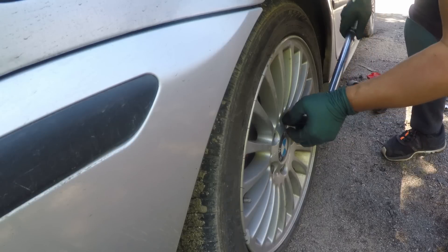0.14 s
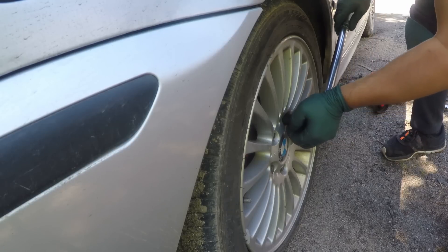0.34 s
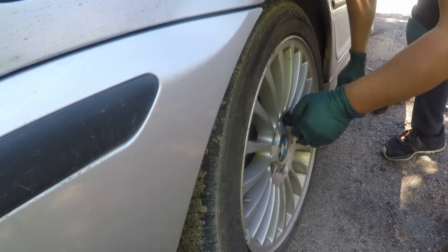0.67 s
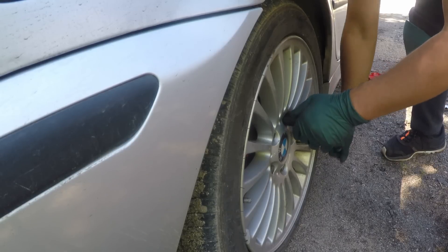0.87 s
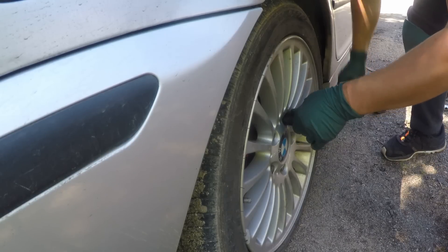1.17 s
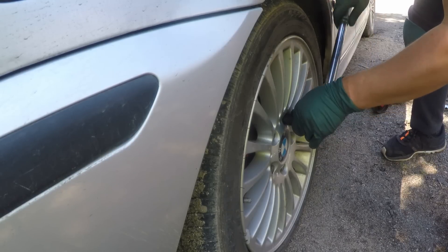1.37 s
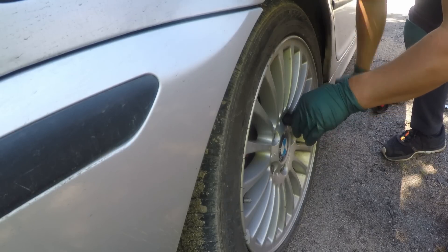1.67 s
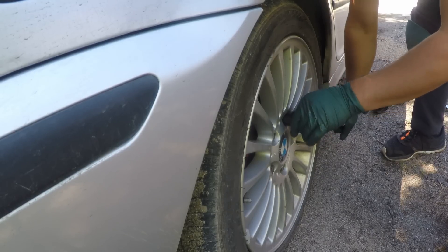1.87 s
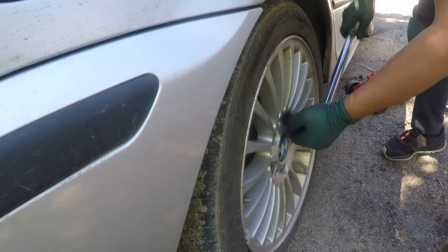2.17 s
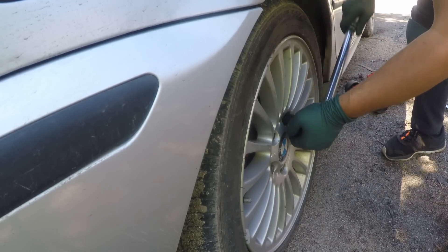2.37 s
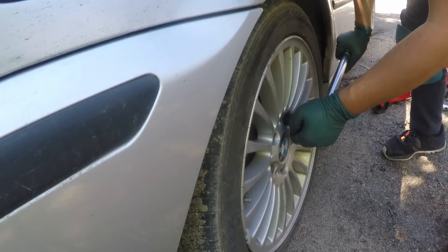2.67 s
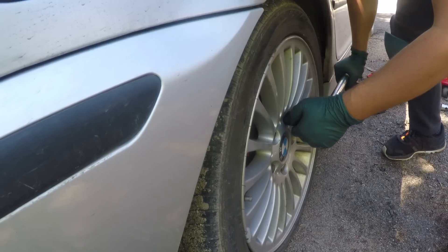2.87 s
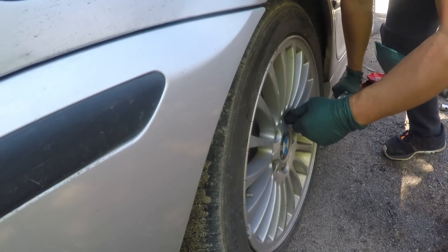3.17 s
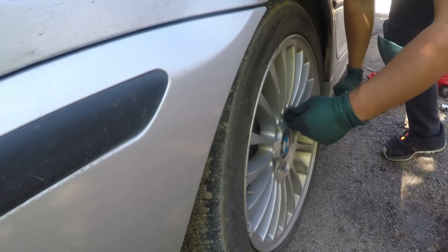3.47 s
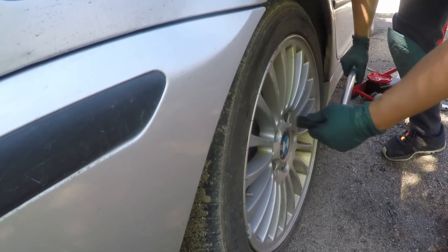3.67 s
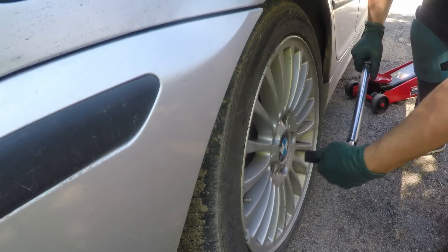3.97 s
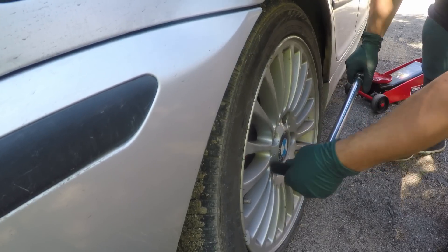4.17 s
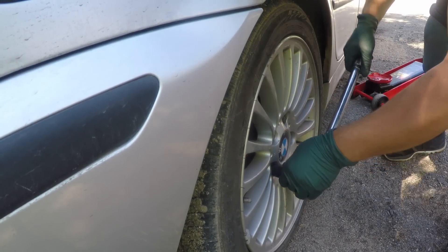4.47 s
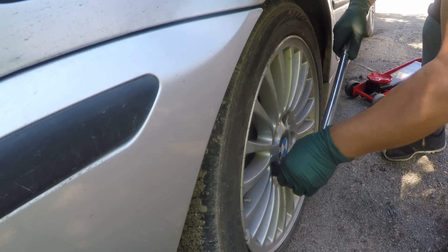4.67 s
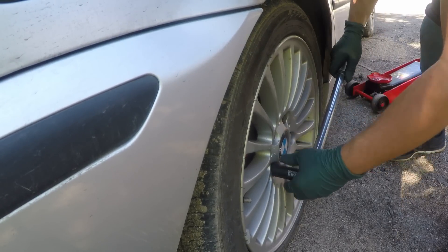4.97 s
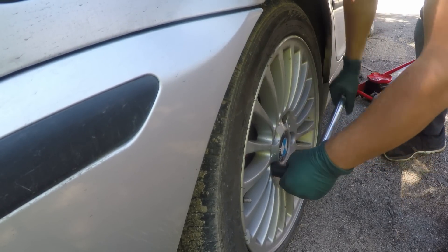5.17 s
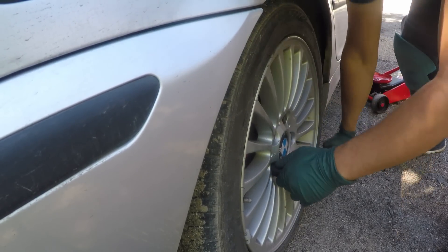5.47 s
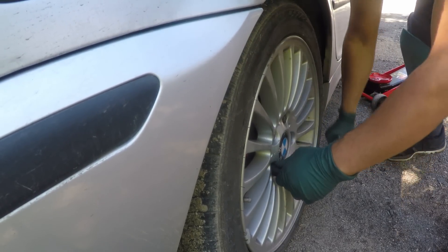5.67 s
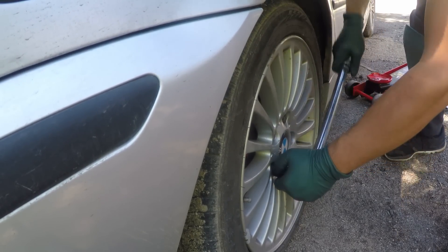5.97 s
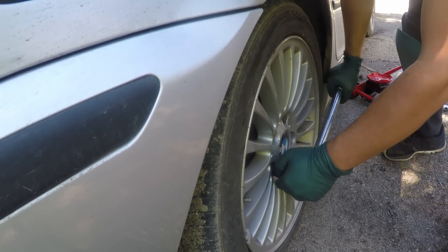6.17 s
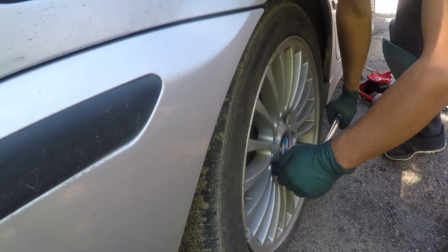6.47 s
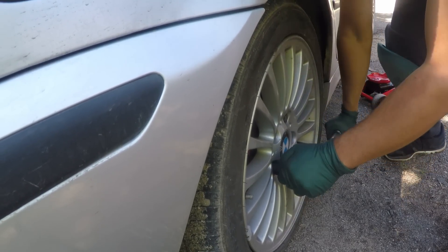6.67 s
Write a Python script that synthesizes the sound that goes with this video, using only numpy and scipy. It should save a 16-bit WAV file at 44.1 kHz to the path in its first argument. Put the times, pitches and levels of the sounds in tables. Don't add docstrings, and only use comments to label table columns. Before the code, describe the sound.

A wrench ratchets on a car wheel bolt outdoors in quick metallic click bursts, with two loud doubled release snaps over a low passing lorry drone.

```python
import sys
import numpy as np
from scipy import signal
from scipy.fft import rfft, irfft
from scipy.io import wavfile
from scipy.ndimage import uniform_filter1d, minimum_filter1d

SR = 44100
rng = np.random.default_rng(int(sys.argv[2]) if len(sys.argv) > 2 else 0)


def pcm_store(signal):
    levels = np.round(np.clip(np.atleast_2d(signal), -1, 1) * 32767)
    wavfile.write(sys.argv[1], SR, levels.astype(np.int16).T)


def amplitude_ratio(level_db):
    exponent = np.asarray(level_db, float) / 20
    return 10 ** exponent


N = 301203
RING = 8192


def unit(x):
    return x / np.sqrt(np.mean(x ** 2))


def colour(x, spectrum):
    hz, db = np.transpose(spectrum)
    f = np.linspace(1, SR / 2, x.shape[-1] // 2 + 1)
    gain = amplitude_ratio(np.interp(np.log(f), np.log(hz), db))
    return irfft(rfft(x) * gain, x.shape[-1])


def coloured_noise(spectrum):
    return unit(colour(rng.standard_normal(N + 1), spectrum))


def walk(rate):
    k = int(SR / rate)
    steps = np.repeat(rng.standard_normal(N // k + 1), k)[:N]
    return 1.3 * uniform_filter1d(uniform_filter1d(steps, k), k)


def fade(t, t60):
    return np.exp(-np.log(1000) * t / t60)


def curves(table):
    s, *columns = np.transpose(table)
    return [np.interp(np.arange(N) / SR, s, column) for column in columns]


def gate(start_s, end_s, edge):
    t = np.arange(N) / SR
    return np.clip(np.minimum(t - start_s, end_s - t) / (edge * (end_s - start_s)), 0, 1)


def tone(hz, db, wobble=0.0036):
    wavering_hz = hz * (1 + wobble * walk(6) + 0.19 * wobble * walk(170))
    return np.sqrt(2) * amplitude_ratio(db) * np.sin(2 * np.pi * np.cumsum(wavering_hz) / SR)


def whistle(table):
    hz, db = curves(table)
    return gate(table[0][0], table[-1][0], 0.21) * tone(hz, db - 7 + 6 * walk(160), .014)


def swells(table):
    t = np.arange(N) / SR
    return sum(np.outer(db, 1 / (1 + ((t - s) / half) ** 2)) for s, half, *db in table)


# (frequency [Hz], level [dB per Hz])
TOWN = [(12, -47), (20, -10.5), (43, -10), (65, -8.5), (86, -9), (123, -18.5), (163, -18.5), (222, -22.5),
        (357, -33.5), (472, -34.5), (1190, -37), (1910, -47), (14700, -71), (16000, -91)]
# (time [s], half-length [s], rumble level [dB], tyre level [dB], hiss level [dB])
TRAFFIC = [
    (0.0, 0.23, -0.5, 1, 5.5),
    (2.0, 0.25, 3, 2.5, 2.5),
    (3.25, .5, 4.5, 7, 3.5),
    (3.8, .3, -0.5, 4.5, 0),
    (4.32, .15, -3.5, 0.5, 3.5),
    (4.7, .12, 9, 0, -1),
]


def town():
    levels = swells(TRAFFIC)
    levels = levels - levels.mean(axis=1, keepdims=True)
    spectrum = rfft(coloured_noise(TOWN))
    octave = np.log2(np.linspace(1, SR / 2, len(spectrum)))
    share_octave = np.log2([50, 140, 500, 1000, 2000, 9000])
    shares = ([0.97, 0.23, 0.052, 0.0023, 0.26, 0.051],
              [0.043, 0.11, 0.84, 0.0062, 0.028, 0.0012],
              [0.23, 0.018, 0.043, 0.011, 0.36, 0.0071])
    out = 0
    for centre in np.arange(4, 15, .5):
        window = np.cos(np.pi * np.clip(octave - centre, -.5, .5))
        band = irfft(spectrum * window, N + 1)[:N]
        share = [np.interp(centre, share_octave, row) for row in shares]
        out = out + band * amplitude_ratio(share @ levels + walk(5))
    return amplitude_ratio(-36.5) * out


# (start time [s], end time [s], start pitch [Hz], end pitch [Hz], level [dB])
BIRD = [
    (0.863, 0.91, 5170, 4780, -58),
    (0.9, 0.957, 4750, 3770, -59.5),
    (1.071, 1.086, 3350, 3060, -50),
    (3.646, 3.68, 4800, 4630, -50),
    (3.79, 3.832, 4500, 4330, -63),
    (5.072, 5.12, 2876, 4080, -63.5),
    (5.185, 5.24, 4870, 4500, -66.5),
    (5.253, 5.31, 3480, 4220, -65),
]


def birds():
    return sum(whistle([(start, hz0, db), (end, hz1, db)]) for start, end, hz0, hz1, db in BIRD)


# (time [s], pitch [Hz], level [dB])
FAN = [
    (4.7, 216.9, -47),
    (5.5, 217.4, -53),
    (6.2, 217.1, -48),
]


def fan():
    return whistle(FAN)


# (time [s], pitch [Hz], level [dB])
LORRY = [(0.0, 63.1, -39.5), (0.5, 69.4, -42.5), (0.85, 74.3, -36), (1.46, 79.43, -33), (1.73, 80.85, -26),
         (2.3, 82.9, -27.5), (2.76, 78.65, -28.5), (2.92, 76.16, -20), (3.1, 71.7, -33), (3.56, 70.84, -26),
         (3.75, 71.1, -34), (4.07, 69.8, -28.5), (4.32, 70.56, -33), (4.55, 76.5, -50), (4.7, 74.84, -31),
         (4.98, 74.2, -43), (5.76, 77.1, -43.5), (6.83, 78, -43)]
# (time [s], pitch [Hz], level [dB])
FIRING = [(0, 103.4, -42), (.2, 107.3, -38), (.42, 109.2, -31.5), (.62, 111.9, -36.5), (.8, 115.9, -41),
          (1.3, 117.1, -39), (1.62, 115, -40), (1.8, 127.8, -42.5), (2.05, 132.4, -35.5),
          (2.6, 132.9, -42.5), (2.9, 120, -40), (3.3, 113.8, -40.5), (3.62, 112, -43.5),
          (3.82, 110.7, -33.5), (4, 110.6, -44), (4.15, 113, -40), (4.4, 114.1, -45.5), (6.83, 119, -51.5)]
# (multiple of the drone [ratio], level against a base that follows the drone's slow swell
# [dB])
LORRY_OVERTONES = [(1.8, -8), (2.01, -18.5), (3.2, -16.5)]
# (start time [s], end time [s], centre [Hz], width [Hz], level [dB])
LORRY_BANDS = [
    (1.88, 2.1, 1186, 42, -56.5),
    (1.86, 2.34, 1666, 26, -58),
    (3.4, 4.158, 580, 67, -49),
    (3.2, 4.1, 690, 94, -51),
    (3.4, 4, 785, 64, -53.5),
]


def lorry():
    hz, drone_db = curves(LORRY)
    swell_db = uniform_filter1d(drone_db - drone_db.mean(), SR)
    flutter_db = 1.5 - .1 * swell_db
    out = tone(hz, drone_db + flutter_db * walk(9.2))
    firing_hz, firing_db = curves(FIRING)
    out += tone(firing_hz, firing_db + 4.5 * walk(24), .025)
    overtone_db = -45.5 + .7 * swell_db
    for multiple, db in LORRY_OVERTONES:
        out += tone(multiple * hz, overtone_db + db + 3 * walk(6.5), .008)
    for start, end, band_hz, width, db in LORRY_BANDS:
        b, a = signal.iirpeak(band_hz, band_hz / width, SR)
        band = signal.lfilter(b, a, rng.standard_normal(N))
        out += amplitude_ratio(db) * unit(band) * gate(start, end, 0.099)
    return out


# (middle time [s], length [s], level [dB])
GLOVE = [
    (5.46, 0.084, -50.5),
    (7.1, 0.05, -55),
    (4.2, 0.052, -67),
    (3.8, 0.093, -68),
    (6.548, 0.025, -53),
    (2.2, 0.03, -62),
]
# (frequency [Hz], level [dB per Hz])
GLOVE_COLOUR = [(600, -16), (1500, 4), (3000, -4), (5000, -4), (7500, -18.5), (12000, -25.5)]


def gloves():
    grains = coloured_noise(GLOVE_COLOUR)[:N] * amplitude_ratio(1.8 * walk(180))
    return grains * sum(amplitude_ratio(db) * gate(s - length / 2, s + length / 2, 0.18) for s, length, db in GLOVE)


# (time [s], wash level [dB], wash t60 [s], tyre thump level [dB], thump pitch [Hz])
ANSWERS = [
    (3.199, -38.5, 0.32, -26, 249.3),
    (3.479, -50, 0.24, -22, 283),
    (6.59, -42, 0.39, -22.5, 305.6),
]
# (frequency [Hz], level [dB per Hz])
WASH = [(500, -12), (1500, -6), (4400, -2), (6500, -3), (9300, -2.5), (10500, -14.5), (14500, -19),
        (16000, -40.5)]


def wheel():
    rise_s, thump_peak_s = .008, .005
    wash = coloured_noise(WASH)[:N] * amplitude_ratio(2.5 * walk(60))
    out = 0
    for s, wash_db, t60, thump_db, hz in ANSWERS:
        t = np.maximum(np.arange(N) / SR - s, 0)
        out = out + amplitude_ratio(wash_db) * wash * (1 - np.exp(-t / rise_s)) * fade(t, t60)
        swell = (t / thump_peak_s * np.exp(1 - t / thump_peak_s)) ** 2
        out = out + amplitude_ratio(thump_db) * swell * np.sin(2 * np.pi * hz * t)
    return out


def hits(events, modes, scatter, rise_s, hold_s, chatter_s, own_db, own_t60, spread_db, ring_share,
         scatter_db, scatter_t60, tail_db, tail_t60, late_db, clean=0):
    out, t = np.zeros(N + RING), np.arange(RING) / SR
    hz, db, t60 = np.transpose(modes)
    spots = rng.standard_normal((len(events), 2, len(hz)))
    noises = rng.standard_normal((len(events), 3, RING))
    f = np.linspace(0, SR / 2, RING + 1)
    after = np.maximum(t - hold_s, 0)
    rise = 1 - np.exp(-t / rise_s)
    for event, (level_shift, pitch_shift), (noise0, noise1, noise2) in zip(events, spots, noises):
        s, peak_db, own_hz, treble_db, scale = event
        own = np.ones(np.size(own_hz))
        contact = noise0 * rise * fade(after, chatter_s * scale)
        ring_hz = np.append(hz * (1 + 0.0033 * pitch_shift), own_hz)
        spin = np.exp(2j * np.pi * np.outer(ring_hz, t))
        mode_gain = amplitude_ratio(np.append(db + spread_db * level_shift, own_db * own))
        gain = mode_gain / np.abs(spin @ contact)
        decay = scale * np.append(ring_share * np.minimum(t60, .3), own_t60 * own)[:, None]
        beat_hz = np.append(45 + 15 * pitch_shift, 0 * own)
        beat = 0.66 + 0.31 * np.cos(2 * np.pi * np.outer(beat_hz, t))
        rings = gain @ (spin.imag * beat * fade(t, decay))
        rung = signal.fftconvolve(contact, rings)[:RING]
        phase = np.exp(2j * np.pi * np.append(pitch_shift, own))[:, None]
        lines = mode_gain @ ((spin * phase).imag * beat * fade(after, decay)) * rise
        rung = (1 - clean) * rung / np.max(np.abs(rung)) + clean * lines / np.max(np.abs(lines))
        patches = amplitude_ratio(3.0 * unit(uniform_filter1d(noise2[:RING // 2 + 1], 90)))
        near = unit(irfft(rfft(colour(noise1, scatter)) * patches))
        near *= rise * (fade(after, scatter_t60 * scale) + amplitude_ratio(late_db) * fade(t, 0.54 * tail_t60))
        far = signal.fftconvolve(noise2 * fade(t, tail_t60), rings * fade(t, .05))[:RING]
        blow = rung / np.max(np.abs(rung)) + amplitude_ratio(scatter_db) * near
        blow += amplitude_ratio(tail_db) * far / np.max(np.abs(far))
        treble = irfft(rfft(blow, 2 * RING) / (1 + (8500 / (f + 1)) ** 4))[:RING]
        blow += treble * (amplitude_ratio(treble_db) * fade(t, 0.097) - 1)
        i = int(s * SR)
        out[i:i + RING] += amplitude_ratio(peak_db) * blow / np.max(np.abs(blow))
    return out[:N]


# (time [s], peak level [dB], loudest ring [Hz], treble level [dB])
TICKS = [(0.3887, -42, 2120, -25), (1.5581, -33.5, 3950, -26), (2.4285, -39.5, 2080, -1),
         (2.5012, -43, 3950, -14), (3.626, -41, 2120, -23), (3.737, -32.5, 2380, -8),
         (4.06, -33.5, 3570, 1), (4.7186, -22, 2970, -22), (4.816, -45, 2610, -10),
         (5.702, -43, 3084, -16.5), (5.7155, -39, 3490, -14), (6.0047, -42, 2950, -8),
         (6.194, -35.5, 2523, -21.5)]
# (frequency [Hz], level [dB], t60 [s])
HEAD = [(1840, -41, 0.17), (2250, -15, 0.06), (2990, -6.5, 0.064), (3250, -5, 0.055), (3600, -26, 0.061),
        (4500, -31, 0.038), (4820, -7, 0.039), (5210, -5, 0.06), (5890, -13, 0.067), (6330, -30, 0.15),
        (7280, -11.5, .035), (8296, -7, 0.06), (10840, -14, 0.042), (12750, -14, 0.082)]
# (frequency [Hz], level [dB per Hz])
KNOCK_SCATTER = [(180, -52), (300, -9), (584, -8), (801, -7), (1150, -5), (1930, -5.5), (2980, -6),
                 (4910, -10), (6520, -17.5), (16000, -31.5)]


def ticks():
    events = [(*tick, 0.81) for tick in TICKS]
    return hits(events, HEAD, KNOCK_SCATTER, rise_s=0.0012, hold_s=0.0029, chatter_s=0.0048,
                own_db=0.1, own_t60=0.042, spread_db=4, ring_share=0.082, scatter_db=-9.5,
                scatter_t60=0.11, tail_db=-30, tail_t60=0.14, late_db=-37)


# (time [s], peak level [dB], own ring [Hz], treble level [dB], decay scale [0-2])
CLUNKS = [
    (3.065, -18.5, 1074, 3, 0.77),
    (4.083, -17, 1038, 8, 0.73),
]
# (frequency [Hz], level [dB], t60 [s])
SOCKET = [(1050, -3.5, 0.096), (1578, 2, 0.1), (2360, -10.5, 0.16), (2700, -12, 0.04987), (3150, -8, 0.09),
          (3494, -7.5, 0.07), (4500, -12, .06), (4930, -10.5, 0.07), (5240, -12, 0.09), (5450, -15, 0.09),
          (6280, -19, 0.061), (8120, -20, 0.0456)]
# (frequency [Hz], level [dB per Hz])
CLUNK_SCATTER = [(410, -43.5), (700, -12), (1020, 1.5), (1920, -9.5), (4860, -11), (14600, -35.5),
                 (16000, -43)]


def clunks():
    return hits(CLUNKS, SOCKET, CLUNK_SCATTER, rise_s=0.00062, hold_s=0.0092, chatter_s=0.034,
                own_db=-2, own_t60=0.046, spread_db=1.6, ring_share=0.95, scatter_db=-9.5,
                scatter_t60=0.18, tail_db=-23, tail_t60=.15, late_db=-23.5, clean=0.77)


# (time [s], peak level [dB], loudest ring [Hz], treble level [dB], decay scale [0-2])
KNOCKS = [
    (0.229, -15.5, 1210, 3, 0.65),
    (0.236, -20.5, 1710, -7, 0.89),
    (.242, -21, 1050, -11, .6),
    (0.2475, -21, 2870, -20, 0.55),
    (4.247, -23, 3280, -21, 1.1),
    (4.742, -11.5, 595, 11, 1.05),
    (4.748, -14, 3490, 0, 0.7),
    (4.756, -17, 2990, 17, 0.98),
]
# (frequency [Hz], level [dB], t60 [s])
RIM = [(537, 3, 0.05), (607, -3.5, 0.25), (1170, -3, 0.06), (1522, -6, 0.07), (1810, -11, 0.046),
       (2210, -2, 0.05), (2950, -12, 0.14), (3490, -10, 0.046), (4000, -7, 0.032), (4500, -23, 0.04),
       (5000, -7, 0.05), (8420, -10, 0.043)]


def knocks():
    return hits(KNOCKS, RIM, KNOCK_SCATTER, rise_s=0.00036, hold_s=0.0021, chatter_s=0.022,
                own_db=6.9, own_t60=0.06, spread_db=5.6, ring_share=0.99, scatter_db=-9.5,
                scatter_t60=0.073, tail_db=-16, tail_t60=0.16, late_db=-7, clean=0.71)


# (time [s], peak level [dB], pawl ring [Hz], gear ring [Hz])
SWING_1 = [(0.0303, -19.5, 3450, 5300), (0.136, -17.5, 3240, 5330), (0.2719, -18, 3040, 4440)]
SWING_2 = [(1.1228, -18.5, 2910, 4930), (1.1526, -16, 3320, 4700), (1.1772, -18.5, 2880, 4910),
           (1.209, -17, 3280, 4720), (1.2394, -14.5, 3390, 5000), (1.27, -16, 3286, 4510),
           (1.3035, -17, 3253, 5010), (1.3401, -17, 3260, 5070), (1.3796, -18, 3080, 4500)]
SWING_3 = [(2.065, -15, 3750, 4775), (2.0979, -18.5, 3600, 5630), (2.1298, -11.5, 2870, 6020),
           (2.1628, -15, 3080, 4367), (2.1998, -15.5, 3040, 4500), (2.2464, -13.5, 2930, 5900)]
SWING_4 = [(4.1038, -16, 3130, 4930), (4.133, -15, 3100, 5200), (4.1624, -18, 3150, 5540),
           (4.1938, -16.5, 3200, 5150), (4.2264, -14, 3250, 5230), (4.2627, -15.5, 3290, 6220),
           (4.2999, -18.5, 3350, 5040)]
SWING_5 = [(4.3927, -16.5, 2965, 4800), (4.4313, -17.5, 2990, 5330), (4.4732, -18, 2990, 5240),
           (4.5048, -18, 2960, 5370), (4.5248, -16, 3380, 5200), (4.6074, -18, 3160, 5250),
           (4.6337, -28, 2820, 5040)]
SWING_6 = [(5.7713, -16, 3110, 5330), (5.8007, -16.5, 2960, 5240), (5.8272, -18.5, 2850, 5050),
           (5.8601, -16, 3090, 5600), (5.902, -19, 3136, 4550)]
# (treble level [dB], decay scale [0-2])
GRIP = [(4.5, 1.03), (6, 1.42), (6, 1.25), (2.5, 0.96), (4.5, 1.02), (4, 1.07)]
# (frequency [Hz], level [dB per Hz])
TOOTH_SCATTER = [(530, -50), (900, -16), (1360, -53), (1510, -4), (2250, -3), (2960, 1), (5820, -3.5),
                 (9770, -12.5), (14700, -13.5), (16000, -1)]


def teeth():
    lead_s = .0007
    firm_db, duller_db_per_db = -21.5, 2.2
    swings = [SWING_1, SWING_2, SWING_3, SWING_4, SWING_5, SWING_6]
    events = []
    for swing, (grip_db, scale) in zip(swings, GRIP):
        for s, db, *ring_hz in swing:
            treble_db = grip_db + duller_db_per_db * min(db - firm_db, 0)
            events.append((s - lead_s, db + 3, ring_hz, treble_db, scale))
    return hits(events, HEAD, TOOTH_SCATTER, rise_s=0.00063, hold_s=0.0017, chatter_s=0.0095,
                own_db=5.3, own_t60=0.027, spread_db=7, ring_share=1.0, scatter_db=-5.5,
                scatter_t60=0.047, tail_db=-20, tail_t60=0.18, late_db=-23.5, clean=0.59)


# (time [s], peak level [dB], own ring [Hz], treble level [dB], decay scale [0-2])
SNAPS = [
    (3.1975, 4, 4272, 5.5, 0.91),
    (3.479, -1.5, 3400, -6, 0.95),
    (6.591, 4.5, 4245, 3.5, 1.48),
    (6.8247, 1, 4080, -6, 0.68),
]
# (frequency [Hz], level [dB], t60 [s])
SHAFT_FIRST = [(326, -12, 0.067), (951, -14, 0.082), (1937, -8.5, .04), (2170, -11, 0.048),
               (3160, -12.5, .04), (440, -10.5, .08), (4430, -0.5, 0.03), (4740, -9.5, .03),
               (5550, -14, .05), (5800, -7, .03), (6153, -16.5, .17), (7260, -10, 0.031),
               (8920, -10.5, 0.04), (13050, -14.5, .07)]
SHAFT_RETURN = [(430, -9, 0.046), (1550, -6, 0.088), (1807, 1, .03), (2680, -12, .04), (2970, -6.5, 0.067),
                (3393, -1, .04), (3770, -9, 0.07), (4700, -4, 0.06), (5270, -13, 0.06), (6158, -21, 0.08),
                (6980, -21, 0.053), (7500, -17, 0.045), (9240, -21, .04), (12750, -3.5, 0.1)]
SHAFT_SECOND = [(481, -12.5, 0.046), (1809, -17, 0.08), (2190, -0.5, 0.031), (3260, -11, 0.036),
                (3910, -4.5, .03), (4364, 1, 0.022), (4450, -5, 0.028), (5571, -12.5, 0.04),
                (6090, -22, 0.16), (6720, -14.5, .03), (7574, -5.5, 0.04), (7450, -24, .16),
                (12980, -9, 0.075), (13420, -13, .03)]
SHAFT_LAST = [(2400, -17, 0.036), (3020, -12, 0.045), (4080, 0, .03), (4750, -12.5, 0.037), (6980, -4, .03),
              (8330, -15, .04), (9580, -19, .04), (12400, -15, .05)]
# (frequency [Hz], level [dB per Hz])
SNAP_SCATTER = [(320, -44), (500, -15.5), (1360, -15), (2190, -3), (2460, -8.5), (4400, -3.5), (5160, -3.5),
                (10100, -15), (13300, -13.5), (16000, -25)]
RETURN_SCATTER = [(240, -20.5), (400, -8), (742, -19), (1510, -10), (2300, -11), (7170, -8.5),
                  (11400, -18.5), (13300, -8.5), (16000, -19)]
LAST_SCATTER = [(500, -39), (1500, -23.5), (2400, -9), (4100, -2), (7000, -6), (10000, -17), (13300, -16),
                (16000, -27.5)]


def snaps():
    out = hits(SNAPS[:1], SHAFT_FIRST, SNAP_SCATTER, rise_s=0.00053, hold_s=0.0038, chatter_s=0.0035,
               own_db=-1.1, own_t60=0.013, spread_db=0.079, ring_share=1.0, scatter_db=-14.5,
               scatter_t60=0.056, tail_db=-30.5, tail_t60=0.3, late_db=-15, clean=0.76)
    out += hits(SNAPS[1:2], SHAFT_RETURN, RETURN_SCATTER, rise_s=0.00055, hold_s=0.0023, chatter_s=0.013,
                own_db=-4, own_t60=0.021, spread_db=0.1, ring_share=1.0, scatter_db=-3.5,
                scatter_t60=0.039, tail_db=-28, tail_t60=0.31, late_db=-15, clean=0.68)
    out += hits(SNAPS[2:3], SHAFT_SECOND, SNAP_SCATTER, rise_s=.0007, hold_s=.0035, chatter_s=.006,
                own_db=0.86, own_t60=.01, spread_db=0.0808, ring_share=0.6, scatter_db=-13.5,
                scatter_t60=0.038, tail_db=-26, tail_t60=0.18, late_db=-28, clean=0.7)
    out += hits(SNAPS[3:], SHAFT_LAST, LAST_SCATTER, rise_s=0.000501, hold_s=0.001, chatter_s=0.005,
                own_db=-8.5, own_t60=.01, spread_db=.08, ring_share=.9, scatter_db=-13,
                scatter_t60=.04, tail_db=-33.5, tail_t60=0.201, late_db=-17, clean=0.44)
    return out


def scene():
    background = town() + birds() + fan() + lorry()
    wrench = ticks() + clunks() + knocks() + teeth() + snaps()
    return (background + gloves() + wheel() + wrench)[None]


# (start time [s], length [s], share of tones kept [0-1])
STARVED = [(1.2445, .022, .5), (1.2795, .02, .45), (2.069, .016, .8), (2.128, .027, .65),
           (2.257, .024, .55), (3.262, .018, .5), (4.153, .022, .4), (4.572, .022, .4), (5.455, .022, .5),
           (6.066, .022, .4), (6.1, .022, .4), (6.694, .022, .5)]


def starve(x):
    safe_hz, top_hz, line_gap_hz = 500, 9100, 450
    treble_tilt, hole_db = .35, -16
    turns = np.exp(2j * np.pi * rng.random((len(STARVED), RING)))
    high = signal.sosfiltfilt(signal.butter(4, safe_hz, "high", fs=SR, output="sos"), x)
    out = x.copy()
    for (s, length, share), phase in zip(STARVED, turns):
        i, n = int(s * SR), 2 * int(length * SR / 2)
        f = np.linspace(0, SR / 2, n // 2 + 1)
        window = signal.windows.tukey(n, .2)
        size = np.abs(rfft(high[i:i + n] * np.sqrt(window)))
        rank = size * f ** treble_tilt / (1 + (f / top_hz) ** 12)
        strongest_near = -minimum_filter1d(-rank, size=int(line_gap_hz * length))
        line = (rank == strongest_near) & (f < top_hz)
        line &= rank >= np.quantile(rank[line], 1 - share)
        held = np.sqrt(4 * uniform_filter1d(size ** 2, size=5))
        kept = np.where(line, held, amplitude_ratio(hole_db) * size)
        out[i:i + n] += window * (irfft(kept * phase[:len(f)], n) - high[i:i + n])
    return out


def top_cut(x):
    return signal.sosfilt(signal.butter(12, 16370, fs=SR, output="sos"), x)


def record(dry):
    clipped = np.clip(starve(dry[0])[None], -1.08, 1.08)
    low_pass = signal.ellip(8, .2, 60, 15300, fs=SR, output="sos")
    mix = np.clip(signal.sosfilt(low_pass, clipped), -1, 1)
    return top_cut(mix)


dry = scene()
out = record(dry)
pcm_store(out)
```